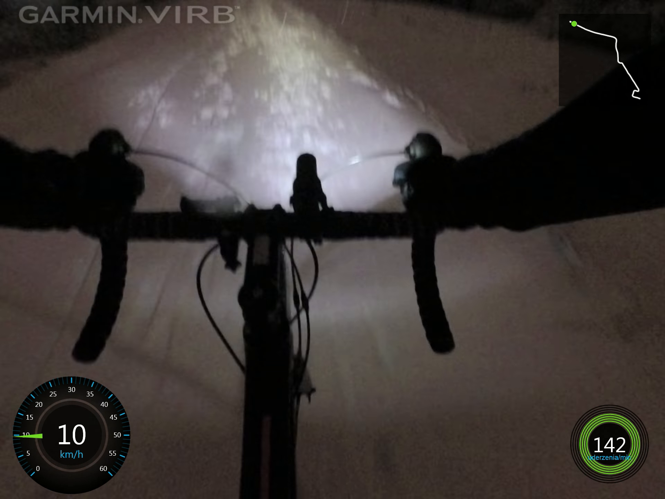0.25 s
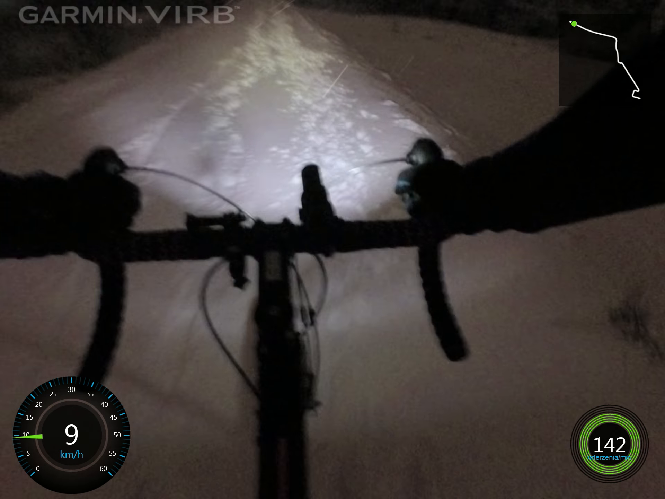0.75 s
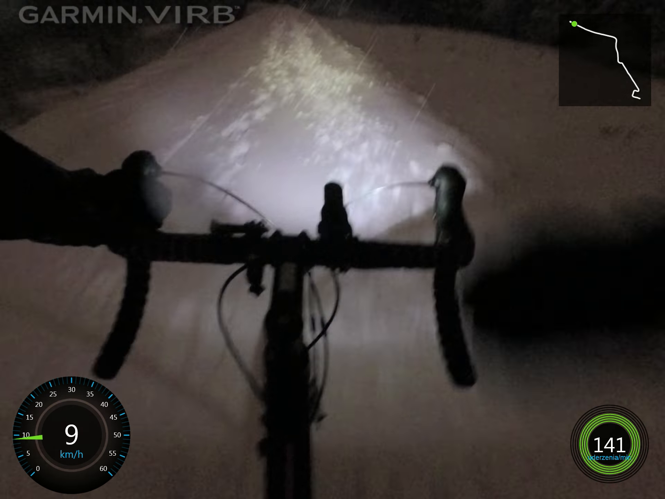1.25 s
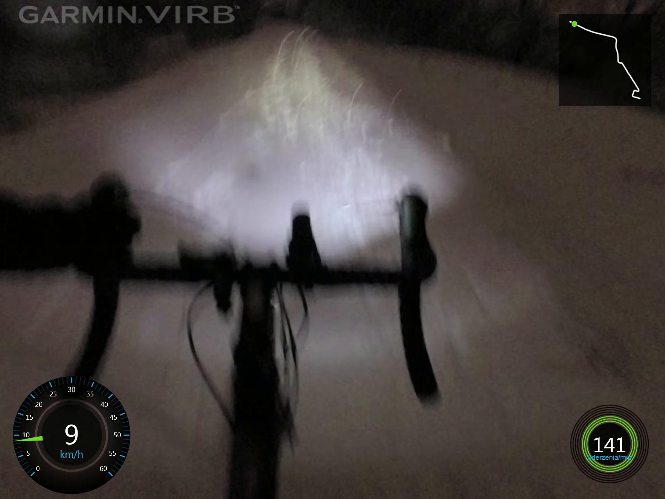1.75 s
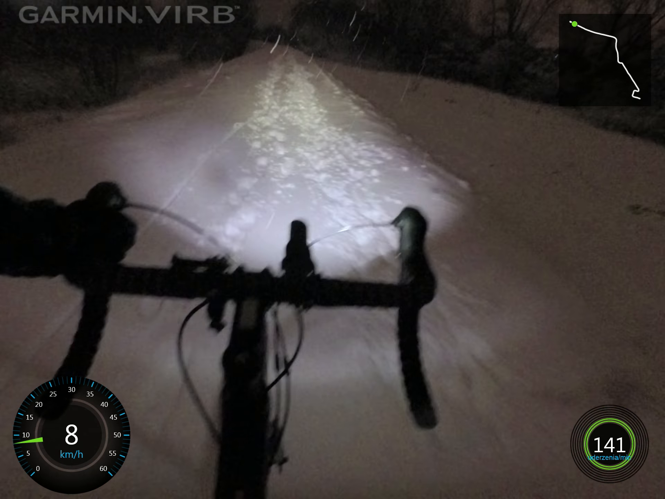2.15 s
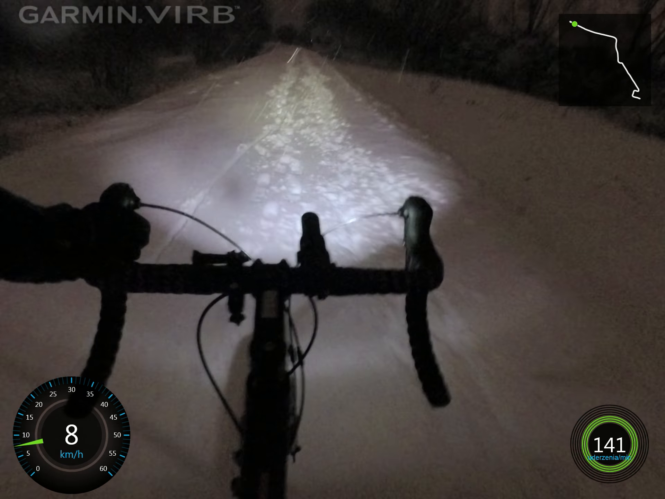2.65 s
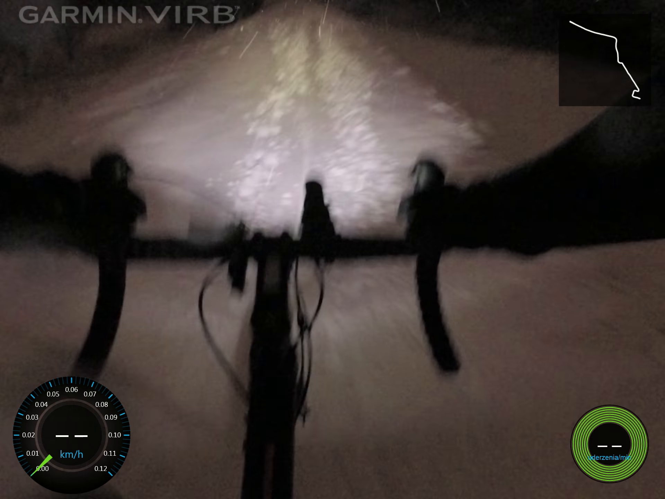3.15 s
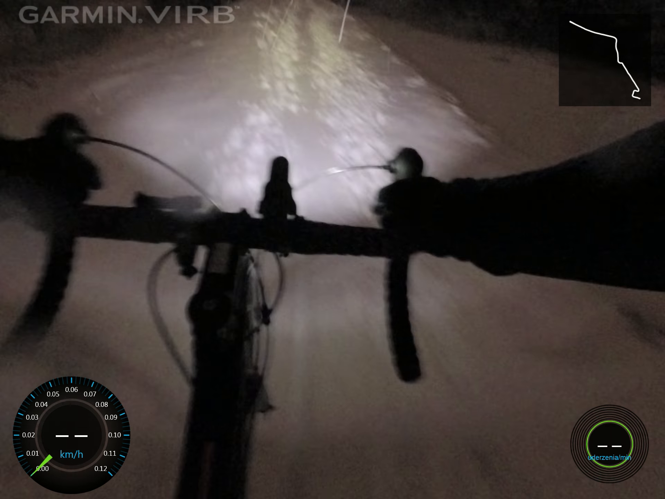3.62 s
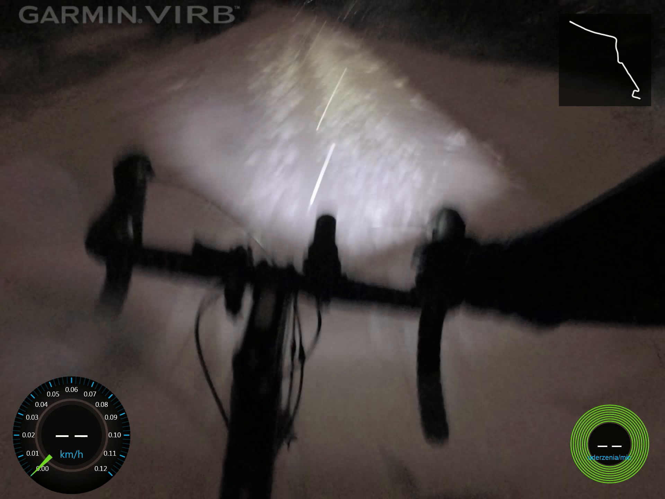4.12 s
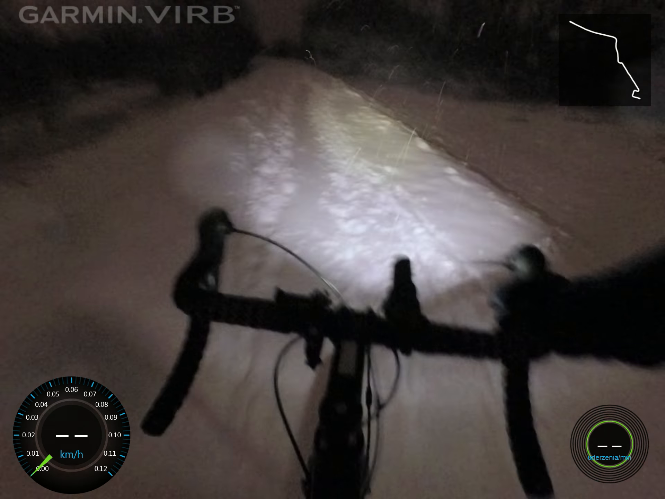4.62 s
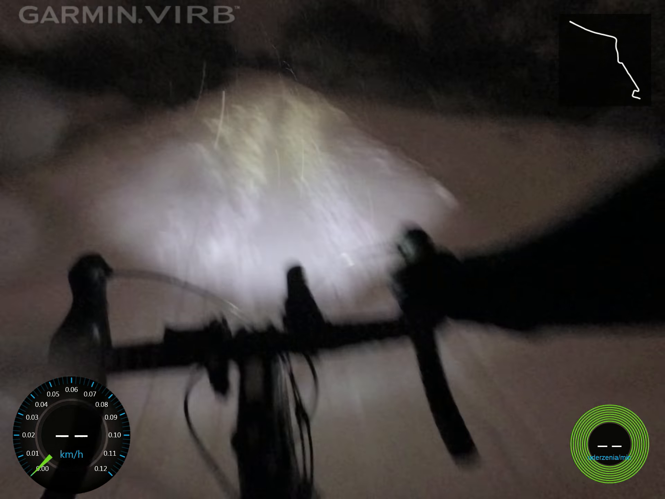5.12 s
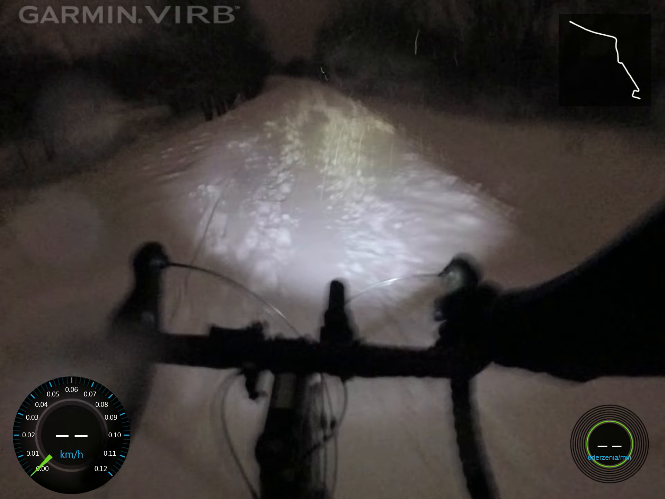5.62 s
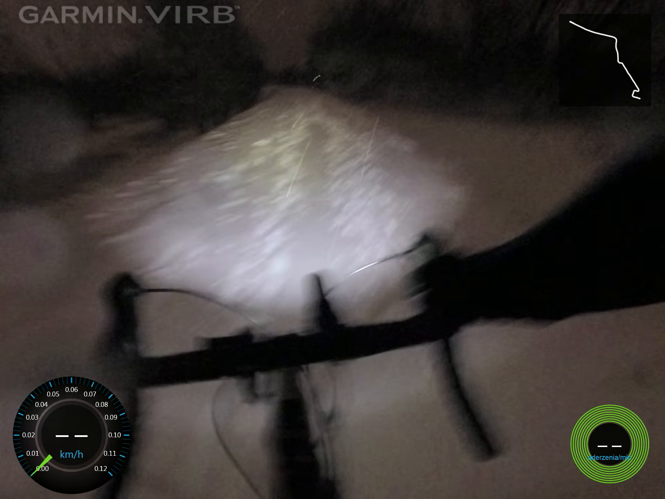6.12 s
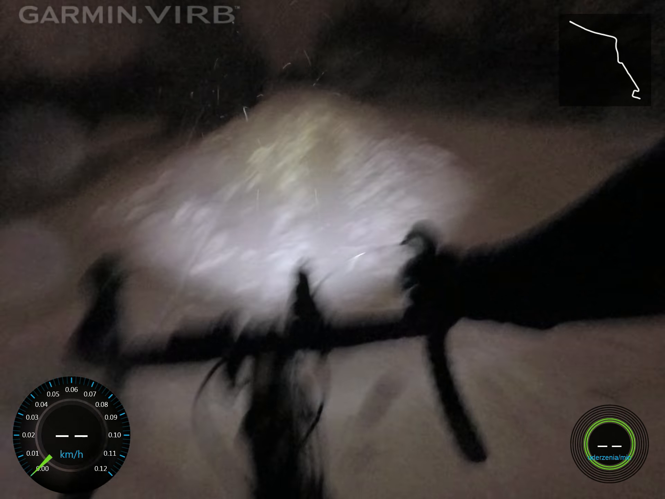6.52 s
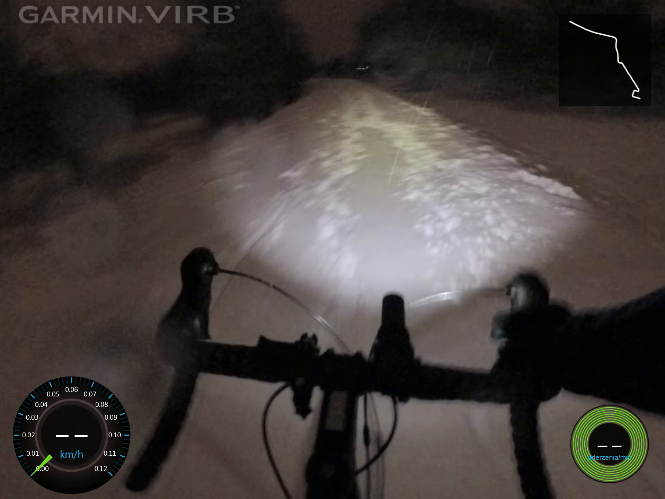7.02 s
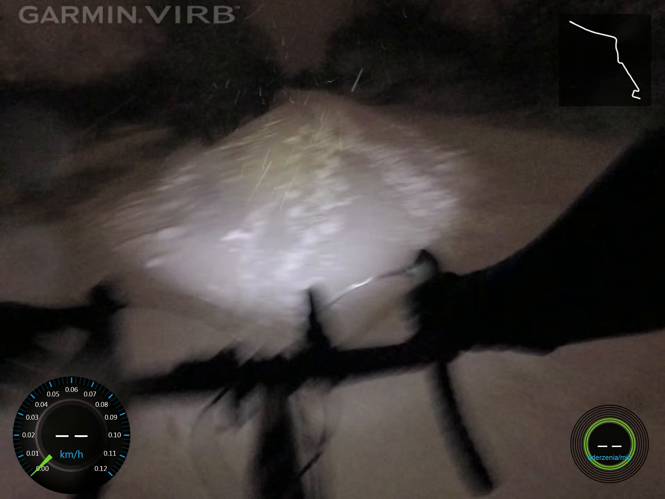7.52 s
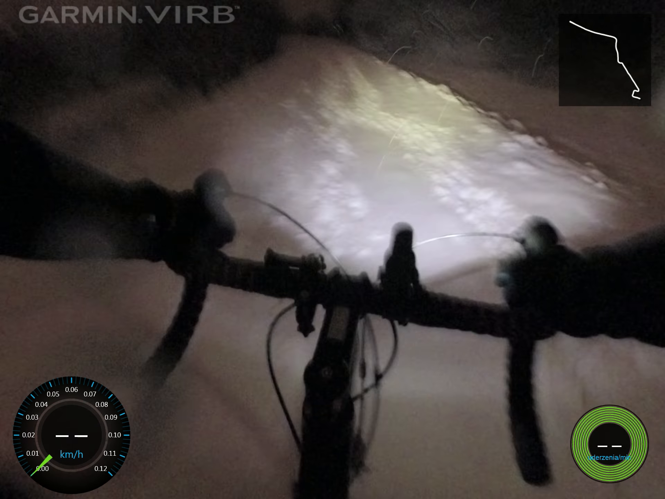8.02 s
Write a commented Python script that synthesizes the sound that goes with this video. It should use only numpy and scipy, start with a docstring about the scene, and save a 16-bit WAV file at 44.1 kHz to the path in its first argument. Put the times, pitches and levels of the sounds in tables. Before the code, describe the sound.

A bicycle moves through snow in the open air, heard from the rider's position. It begins quietly with faint hiss, low rumble, short high squeaks and dull taps. Distorted wind buffets and scraping snow dominate for about a second and a half, then break off for an instant. Irregular packed-snow crunches follow, with crumbling lumps, hollow knocks and fine icy ticks. A throbbing puff strikes late, and the crunch grows heavier at the end.

```python
"""A bicycle rolls slowly through fresh snow, heard through a camera on the rider.
From the start tyres crunch (dense fractures) and hiss (filtered noise) under a rumble of air and its gusts.
Squeaks (gliding sines) come early, snow clumps knock on the housing (damped modes), small lumps snap.
From about 1.5 s gusts overload the microphone and blown snow rasps across it; the level dips briefly near 2.9 s.
Later, fine ice ticks on the housing, and near 6.9 s a strong eddy throbs at the microphone port."""
import sys
import numpy as np
from scipy import signal
from scipy.fft import rfft, irfft, next_fast_len
from scipy.io import wavfile
from scipy.ndimage import map_coordinates

SR = 44100
rng = np.random.default_rng(int(sys.argv[2]) if len(sys.argv) > 2 else 0)


def persist_wave(psi):
    """Save psi, clipped to +-1, as 16-bit WAV."""
    counts = np.round(np.clip(psi, -1, 1) * 32767).astype(np.int16)
    wavfile.write(sys.argv[1], SR, np.atleast_2d(counts).T)


N = 364245

# dull spectrum of snow being packed: (frequency [Hz], relative level [dB])
PACKING_SPECTRUM = [(30, -8.5), (110, -7.5), (220, -2), (340, -2), (430, -6.5), (560, -15.5), (800, -31),
                    (3000, -72)]


def amp(db):
    """Decibels to gain."""
    return 10 ** (np.asarray(db) / 20)


def unit(x):
    """Scale to rms 1."""
    return x / np.sqrt(np.mean(x ** 2) + 1e-20)


def clock():
    """The time of every sample [s]."""
    return np.arange(N) / SR


def curves(rows):
    """One value per sample for each column after the time, on straight lines between the rows."""
    s, *cols = np.transpose(rows)
    return [np.interp(clock(), s, c) for c in cols]


def wobble(rate):
    """A smooth random curve, rate knots a second."""
    knots = rng.standard_normal(int(N * rate / SR) + 4)
    return map_coordinates(knots, [np.arange(N) * rate / SR])


def coloured(x, points):
    """x through a causal minimum-phase filter with the given (Hz, dB) shape, at rms 1."""
    size = 2 * next_fast_len(N // 2 + SR // 8)
    hz, db = np.transpose(points)
    log_hz = np.log(np.fft.rfftfreq(size, 1 / SR) + 1)
    log_gain = np.log(amp(np.interp(log_hz, np.log(hz), db)))
    # folding the cepstrum onto positive time makes the filter causal
    cepstrum = irfft(log_gain)
    cepstrum[1:size // 2] *= 2
    cepstrum[size // 2 + 1:] = 0
    response = np.exp(rfft(cepstrum))
    return unit(irfft(rfft(x, size) * response)[:N])


def noise(points):
    """Coloured noise of rms 1."""
    return coloured(rng.standard_normal(N), points)


def grains(rate, spread_db):
    """Random tiny fractures, on average rate a second, of very unequal size and random sign, at rms 1."""
    size = amp(spread_db * np.clip(rng.standard_normal(N), -2, 2))
    happens = rng.random(N) < rate / SR
    return unit(happens * size * np.sign(rng.standard_normal(N)))


def swell(centre, half):
    """A bell-shaped rise and fall, down to 1/e at half seconds from its centre."""
    return np.exp(-np.minimum(((clock() - centre) / half) ** 2, 100))


def add(track, s, sound):
    """Mix a sound into the track at time s."""
    part = track[max(round(s * SR), 0):][:len(sound)]
    part += sound[:len(part)]


def tyres():
    """Snow crumbles in dense fine fractures under the tread, swelling at every ridge, over a hiss of powder."""
    # how firmly the tyres pack the snow between ridges: (time [s], crunch level [dB])
    crunch = [(0, -46.5), (1.3, -36), (2.97, -36.5), (3.3, -33.5), (3.9, -37), (6.9, -33), (8.26, -22.5)]
    # how brittle the snow is: (time [s], level of the crisp crunch relative to the dull one [dB])
    brittleness = [(2.9, -1), (3.1, -17), (3.8, -10.5), (4.4, -2.5), (6.2, -4), (8.26, -7)]
    # powder sliding off the tyres: (time [s], hiss level [dB])
    powder = [(0, -36), (1.6, -37), (2.9, -42.5), (3.4, -36), (8.26, -37.5)]
    # ridges of snow that crumble under a tyre: (centre [s], half length [s], crunch level [dB])
    ridges = [(0.92, 0.038, -30.5), (3.117, 0.041, -20.5), (3.215, 0.028, -23), (3.42, 0.1, -21.5),
              (3.725, 0.18, -25.5), (4.115, 0.033, -22.5), (4.218, 0.038, -25.5), (4.488, 0.047, -30.5),
              (4.744, 0.14, -29), (4.952, 0.035, -27), (5.156, 0.16, -27), (5.588, 0.017, -18.5),
              (5.7, 0.014, -18), (6.03, 0.027, -31), (6.188, 0.049, -23.5), (6.44, 0.043, -23),
              (6.666, 0.032, -24.5), (6.903, 0.067, -27), (7.202, 0.02, -19.5), (7.432, 0.025, -29),
              (7.785, 0.18, -27.5), (7.981, 0.024, -17)]
    # spectra of breaking crust and sliding powder: (frequency [Hz], relative level [dB])
    crisp_spectrum = [(150, -7), (400, 0.5), (620, 12), (950, -3.5), (1400, -16.5), (2700, -15.5),
                      (12000, -68.5)]
    hiss_spectrum = [(180, 8), (350, 23), (520, 11), (900, 6), (1200, -2.5), (3200, -7), (3850, -2),
                     (5200, -20.5), (6150, -30), (7250, -12), (8300, -20.5), (16000, -53)]
    crust_ratio = 1.31  # pitch step from one size of snow crust to the next
    scrape_db = -12  # powder scraped off with the crisp crunch, relative to it

    packing_db, = curves(crunch)
    powder_db, = curves(powder)
    brittle_db, = curves(brittleness)
    load = amp(packing_db + 2 * wobble(rate=12))  # small random bumps in the snow
    for s, half, db in ridges:
        load = np.hypot(load, amp(db) * swell(s, half))
    crisp_load = load * amp(brittle_db)

    clumps = amp(5.3 * wobble(rate=75))  # fractures come in bunches
    packing = coloured(grains(rate=1500, spread_db=4.5) * clumps, PACKING_SPECTRUM)
    crusts = np.zeros(N)
    for size in (-1, 0, 1):  # large, middling and small crusts
        spectrum = [(hz * crust_ratio ** size, db) for hz, db in crisp_spectrum]
        crusts += coloured(grains(rate=110, spread_db=5.0) * clumps, spectrum)
    crisp = unit(crusts)

    sliding = amp(powder_db + 2.3 * wobble(rate=25))
    hiss = noise(hiss_spectrum) * np.hypot(sliding, amp(scrape_db) * crisp_load)
    return load * packing + crisp_load * crisp + hiss


def wind():
    """Slow pressure lumps rumble on the microphone; each gust is a burst of low swing with extra rumble."""
    # air flow on the microphone: (time [s], rumble level [dB])
    air = [(0, -50.5), (1.42, -38.5), (1.52, -28.5), (2.3, -32), (2.9, -21), (2.97, -39.5), (5.3, -37.5),
           (6.8, -35.5), (8.26, -27)]
    # gusts on the microphone: (centre [s], half length [s], buffet level [dB])
    gusts = [(0.311, 0.029, -25), (1.484, 0.0088, 3.5), (1.542, 0.009, -9), (1.768, 0.01, -4),
             (1.882, 0.0095, -6), (2.023, 0.015, -6.5), (2.137, 0.021, -12.5), (2.238, 0.019, -11),
             (2.49, 0.012, -3), (2.642, 0.1, -26), (2.908, 0.022, -11)]
    # spectrum of the rumble: (frequency [Hz], relative level [dB])
    rumble_spectrum = [(15, -14), (30, -3), (65, -0.5), (120, -5), (200, -9), (400, -25), (1000, -34.5),
                       (4000, -88.5)]

    air_db, = curves(air)
    churn = amp(air_db + 5.6 * wobble(rate=10))
    swings = np.zeros(N)
    for s, half, buffet_db in gusts:
        gust = swell(s, half)
        swing_hz = 58 * np.exp(0.33 * rng.standard_normal())
        swing = np.sin(2 * np.pi * (swing_hz * clock() + rng.random()))
        swings += amp(buffet_db) * gust * swing
        churn += amp(buffet_db - 5.5) * gust
    return swings + churn * noise(rumble_spectrum)


def squeaks():
    """Something on the bicycle sticks and slips in brief gliding whistles with a faint octave."""
    # short squeaks: (centre [s], half length [s], pitch at centre before waver [Hz],
    # glide [octaves/s], level [dB])
    squeak_rows = [(.475, 0.0069, 3390, -9.5, -27.5), (0.916, .004, 3710, 16.5, -19.5),
                   (0.92, 0.0057, 3830, 1.5, -17), (1.35, 0.0055, 2070, -10, -32.5),
                   (1.441, 0.0022, 3370, 1, -30)]
    track = np.zeros(N)
    waver = 0.01 * wobble(rate=1000)  # octaves
    for s, half, hz, glide, db in squeak_rows:
        octaves = glide * np.clip(clock() - s, -2 * half, 2 * half) + waver
        phase = 2 * np.pi * np.cumsum(hz * 2 ** octaves) / SR
        whistle = np.sin(phase) + amp(-37) * np.sin(2 * phase)
        track += amp(db) * swell(s, half) * whistle
    return track


def snow_covered_port(x):
    """The snow-covered port lets little treble or deep bass through."""
    port_low_hz, port_high_hz = 63, 2660
    muffled = signal.sosfilt(signal.butter(4, port_high_hz, fs=SR, output="sos"), x)
    return signal.sosfilt(signal.butter(2, port_low_hz, "highpass", fs=SR, output="sos"), muffled)


def knocks():
    """Each clump kicks all the housing's damped modes at once, pushes a low thud into the port and crumbles."""
    # snow clumps on the housing: (time [s], strength [dB],
    # hardness as tilt of the ring [dB/octave], pitch of the thud [Hz])
    clump_rows = [(0.5083, -6.5, 3, 155), (0.7382, -13, 0.5, 80), (0.9638, -5, 3, 82),
                  (1.4627, -9, -2, 173), (1.4871, -13, 10, 205), (1.594, -4.5, 2.5, 139),
                  (1.7307, -4.5, -4, 85), (1.809, 0, 1.5, 190), (1.8161, -6.5, 3, 80),
                  (1.8839, -6.5, -1, 155), (1.9523, -15.5, -4, 150), (2.0123, -4.5, -6.5, 168),
                  (2.0513, -5.5, -2, 147), (2.1376, -2, -6, 192), (2.3096, -9, 4.5, 80),
                  (2.3779, -5.5, -1.5, 206), (2.4735, -1, -13, 130), (2.483, -2.5, -3, 191),
                  (2.5974, -4.5, 1, 104), (2.9007, 0, -6.5, 144), (3.349, 0.0, 0.5, 108),
                  (3.5129, -5, 3.5, 126), (4.1516, -13, -10, 80), (4.2645, -9.5, 12, 151),
                  (4.5573, -12.5, -0.5, 142), (4.591, -1, 6, 100), (5.5839, -7.5, 3, 220),
                  (5.6149, -10.5, 4, 270), (5.6703, -14.5, 3.5, 220), (5.7911, -9.5, 4.5, 205),
                  (5.8231, -15, -3, 120), (5.9892, -9.5, 3, 230), (6.0346, -10, 4.5, 300),
                  (6.1244, -13.5, 8, 209), (6.4225, -7, 5.5, 275), (6.9375, -11.5, -2, 131),
                  (7.0945, -9, 6.5, 121), (7.1584, -14, 7, 205), (7.3418, -12.5, 4, 232),
                  (7.375, -14.5, 2, 257), (7.4259, -10.5, 4, 180), (7.4566, -5.5, -1, 173),
                  (7.4667, -8, 3, 125), (7.6133, -8.5, 6, 172), (7.7025, -7, 3.5, 218),
                  (7.7377, -5, 12.5, 192), (7.8138, -3.5, 4, 198), (7.8855, -5.5, 2, 124),
                  (7.997, -1, -0.5, 117), (8.1135, -11.5, -8, 290), (8.1233, -10, 5.5, 307),
                  (8.227, -9.5, 5.5, 80)]
    # modes of the housing: (frequency before detuning [Hz], level before tilt and scatter [dB],
    # time to fall 60 dB [s])
    housing = [(361.7, 3.5, 0.019), (565.7, -4, .03), (688.4, -4.5, 0.026), (964, -10.5, 0.018),
               (2424, -14.5, 0.0082)]
    thud_db, thud_t60_s = 6.5, 0.024
    contact_s = 0.0001  # softens the onset

    track = np.zeros(N)
    t = np.arange(SR // 12) / SR
    hz, mode_db, t60 = np.transpose(housing)[:, :, None]
    octaves = np.log2(np.minimum(hz, 1000) / 450)  # the tilt pivots at 450 Hz and stops at 1000 Hz
    for s, db, tilt_db, thud_hz in clump_rows:
        detune, scatter_db = rng.standard_normal((2, len(housing), 1))
        mode_level = amp(mode_db + tilt_db * octaves + scatter_db - 60 * t / t60)
        modes = mode_level * np.sin(2 * np.pi * hz * np.exp(0.06 * detune) * t)
        thud = np.sin(2 * np.pi * thud_hz * t) * amp(thud_db - 60 * t / thud_t60_s)
        ring = (modes.sum(axis=0) + thud) * (1 - np.exp(-t / contact_s))
        # crumbs strike again at random after the first blow, ever more weakly
        crumb_happens = rng.random(len(t)) < 1400 / SR
        crumbs = crumb_happens * rng.uniform(-1.43, 1, len(t)) * amp(-11.5 - 60 * t / 0.027)
        blows = (t == 0) + crumbs
        add(track, s, amp(db) * signal.fftconvolve(ring, blows)[:len(t)])
    return snow_covered_port(track)


def lumps():
    """A small lump collapses under a tyre in a handful of quick damped snaps, each with its own pitch."""
    # small lumps collapsing: (time [s], peak level [dB])
    lump_rows = [(1.031, -20), (2.517, -8), (2.844, -10.5), (2.993, -12.5), (3.054, -13), (3.452, -12.5),
                 (3.653, -11.5), (3.699, -16.5), (3.822, -13), (3.847, -19), (4.073, -10.5), (4.116, -19.5),
                 (4.312, -15.5), (4.486, -10.5), (4.673, -15), (4.758, -12.5), (4.976, -8), (5.702, -10.5),
                 (6.372, -11), (6.688, -13), (7.025, -13), (7.201, -11)]
    middle_hz, log_spread = 602, 0.56  # pitches of the snaps
    life_cycles = 1.38  # cycles until a snap falls to 1/e
    scatter_s = 0.001186  # mean delay of a snap

    track = np.zeros(N)
    t = np.arange(SR // 30) / SR
    for s, db in lump_rows:
        hz = middle_hz * np.exp(log_spread * rng.standard_normal(size=(7, 1)))
        age = np.maximum(t - scatter_s * rng.exponential(size=(7, 1)), 0)
        snaps = np.sin(2 * np.pi * hz * age) * np.exp(-hz * age / life_cycles)
        collapse = snaps.sum(axis=0)
        add(track, s, amp(db) * collapse / np.abs(collapse).max())
    return track


def sprays():
    """Blown snow scrapes across the port: coarse grains rasp and fine ones fizz, in the same flurries."""
    # snow blown across the port: (centre [s], half length [s], rasp level [dB], fizz level [dB])
    spray_rows = [(1.5, .04, -26, -40), (1.768, .036, -17, -23), (2.015, .018, -23, -31),
                  (2.138, .02, -10, -18), (2.222, .021, -13, -30), (2.48, .033, -14, -24),
                  (2.64, .1, -29, -44), (2.91, .021, -25, -40), (7.968, .02, -26, -34)]
    # spectra of coarse and fine grains: (frequency [Hz], relative level [dB])
    rasp_spectrum = [(100, 5), (290, 25), (550, 6.5), (750, 17), (1100, 8.5), (1600, -11), (2600, -30.5),
                     (5200, -40.5)]
    fizz_spectrum = [(700, 19), (1900, 5), (2700, -4), (3700, 2), (6400, -23.5), (7600, -19.5),
                     (15000, -52)]

    rasp_level = sum(amp(db) * swell(s, half) for s, half, db, _ in spray_rows)
    fizz_level = sum(amp(db) * swell(s, half) for s, half, _, db in spray_rows)
    flurries = amp(3.5 * wobble(rate=190))
    rasp = coloured(grains(rate=2100, spread_db=2.0) * flurries, rasp_spectrum)
    fizz = unit(noise(fizz_spectrum) * flurries)
    return rasp_level * rasp + fizz_level * fizz


def ice():
    """Sprays of crystals tick on the housing's high resonances."""
    # sprays of ice crystals: (centre [s], level [dB], half length [s])
    ice_rows = [(3.61, -32.5, 0.00098), (5.173, -42.5, 0.012), (5.522, -35, 0.0017), (5.824, -38, 0.0021),
                (7.049, -40.5, 0.0024), (7.157, -42, 0.0046), (7.349, -40.5, 0.0092), (7.535, -39.5, 0.014),
                (7.719, -38, 0.011), (7.884, -46.5, 0.12)]
    # spectrum of the ticks: (frequency [Hz], relative level [dB])
    tinkle_spectrum = [(1500, -40), (4000, 0.5), (6200, -23), (7150, 7), (7900, -9), (9000, -9),
                       (10500, -25), (15000, -38)]
    level = sum(amp(db) * swell(s, half) for s, db, half in ice_rows)
    return level * coloured(grains(rate=3000, spread_db=5), tinkle_spectrum)


def eddy():
    """A lopsided pressure swing strikes, holds and fades to a weaker tail as its throb quickens, then slows."""
    start_s, length_s, ramp_s = 6.896, 0.11, 0.0077  # the ramp shapes both ends
    peak_db, hold_s, fall_db_per_s, tail_db = 6, 0.024, 316, -10.5
    base_hz, rise_octaves = 57.3, 1.2  # before the random waver
    fastest_s, rise_half_s = 0.068, 0.038  # the throb is fastest this long after the start

    age = clock() - start_s
    gate = np.clip(np.minimum(age, length_s - age) / ramp_s, 0, 1)
    fading_db = peak_db - fall_db_per_s * np.maximum(age - hold_s, 0)
    level = gate * amp(np.maximum(fading_db, tail_db))
    hz = base_hz * 2 ** (rise_octaves * swell(start_s + fastest_s, rise_half_s))
    wavering_hz = hz * (1 + 0.093 * wobble(rate=90))
    phase = 2 * np.pi * np.cumsum(wavering_hz * (age > 0)) / SR
    lopsided = amp(-16.5) * np.sin(2 * phase)
    rough = amp(-28.5) * noise(PACKING_SPECTRUM)
    return -level * np.sin(phase) + gate * (lopsided + rough)


def scene():
    """Everything reaches the one microphone."""
    rolling = tyres() + lumps() + squeaks()
    housing = knocks() + ice()
    air = wind() + sprays() + eddy()
    return (rolling + housing + air)[None]


def record(dry):
    """The level dips briefly once; loud peaks clip, and a steep low-pass removes the highest treble."""
    top_hz = 16000
    # (time [s], level [dB])
    dip_db, = curves([(2.931, 0), (2.935, -32), (2.962, -32), (2.968, 0)])
    clipped = np.clip(dry * amp(dip_db), -1, 1)
    return signal.sosfiltfilt(signal.butter(12, top_hz, fs=SR, output="sos"), clipped)


dry = scene()
out = record(dry)
persist_wave(out)
```